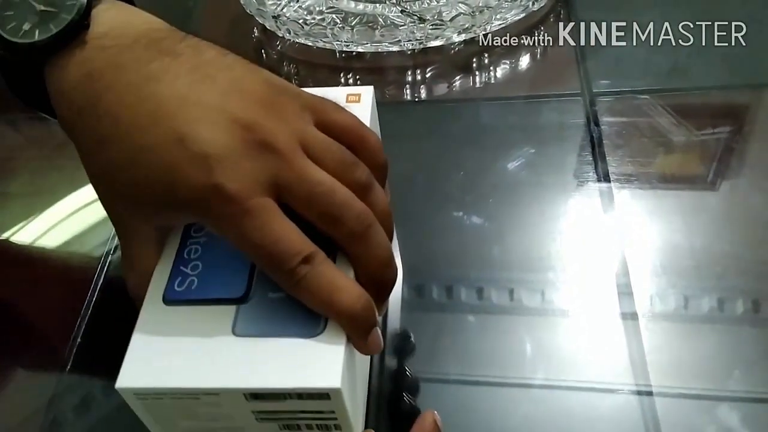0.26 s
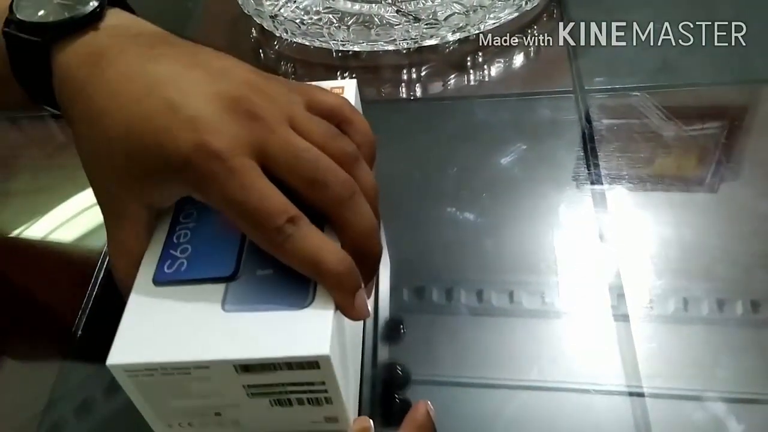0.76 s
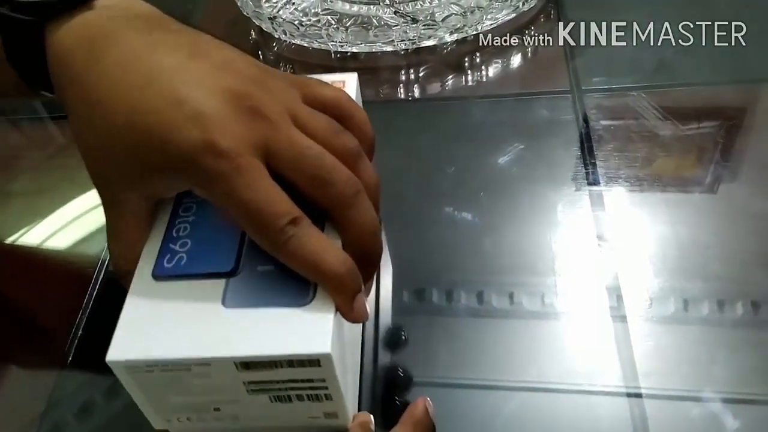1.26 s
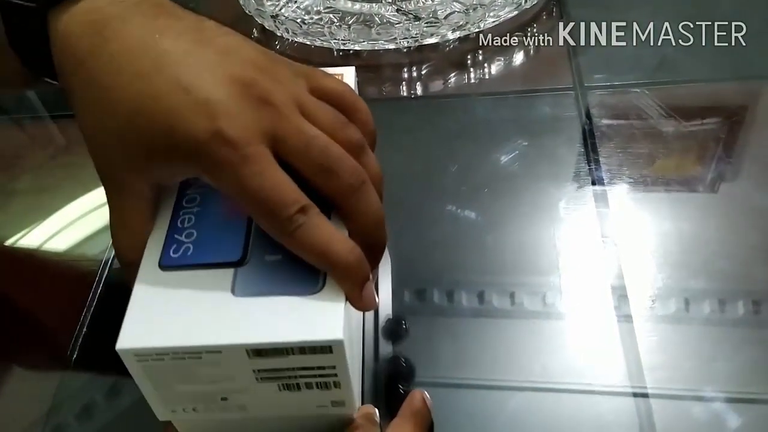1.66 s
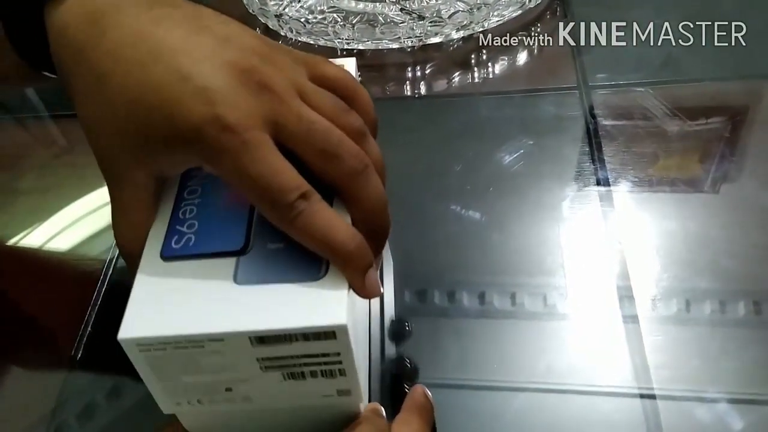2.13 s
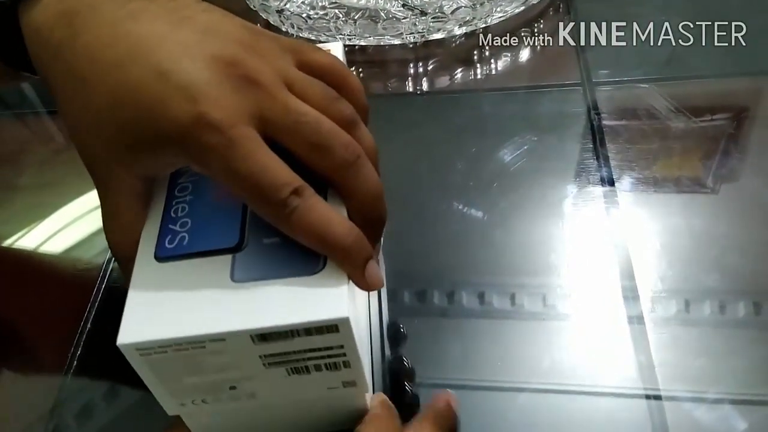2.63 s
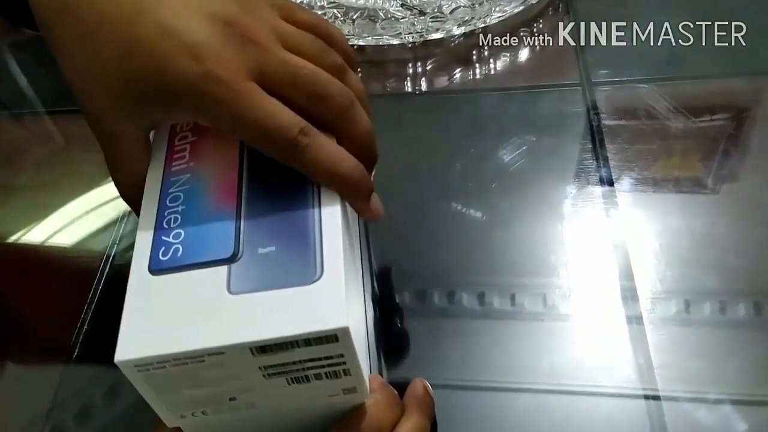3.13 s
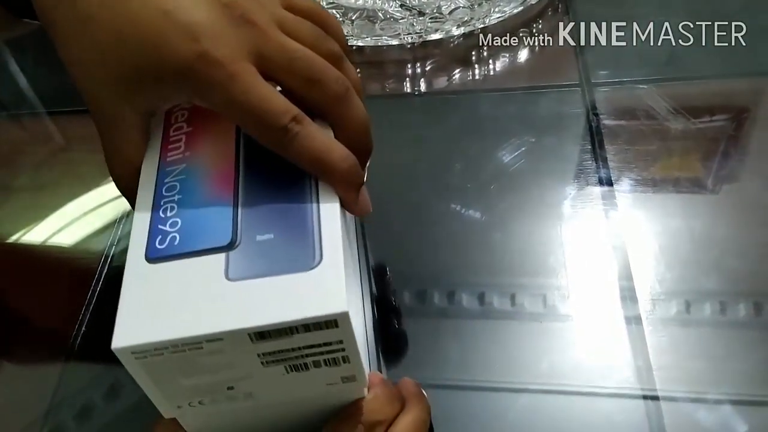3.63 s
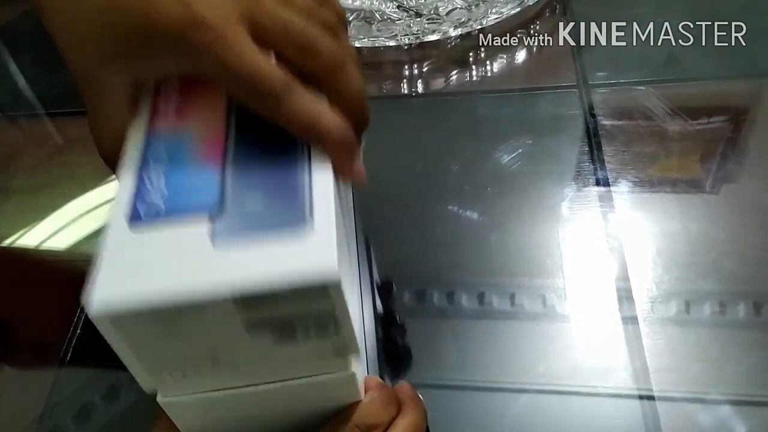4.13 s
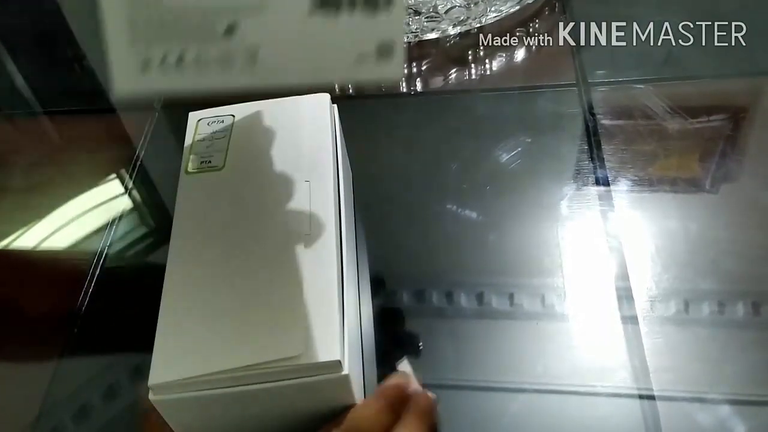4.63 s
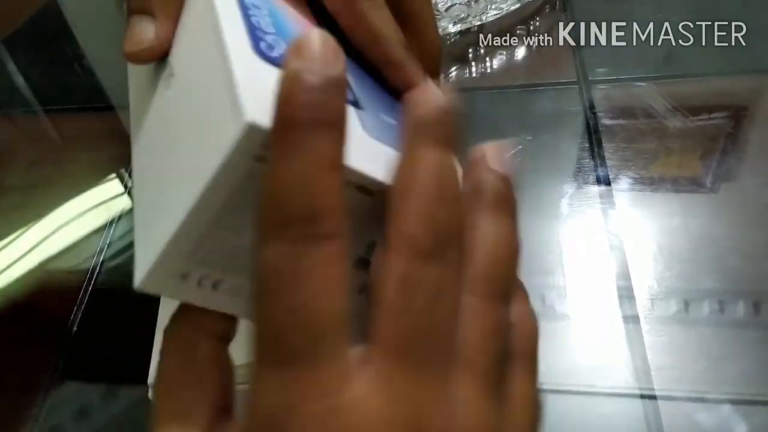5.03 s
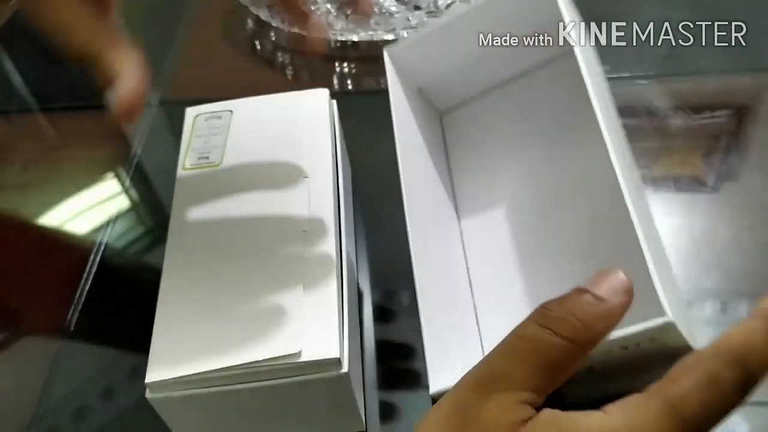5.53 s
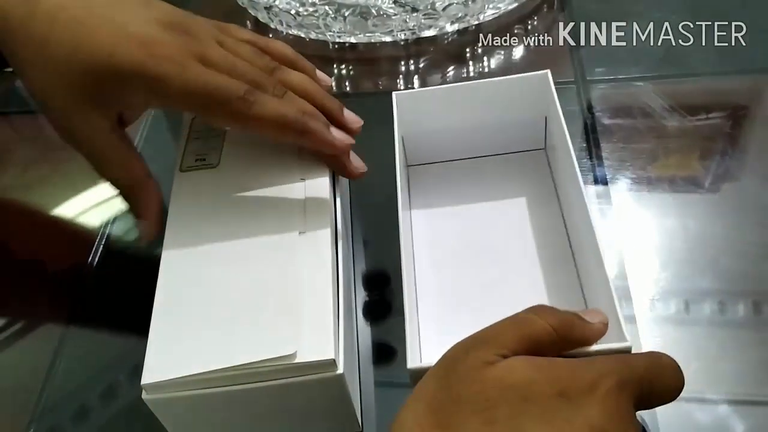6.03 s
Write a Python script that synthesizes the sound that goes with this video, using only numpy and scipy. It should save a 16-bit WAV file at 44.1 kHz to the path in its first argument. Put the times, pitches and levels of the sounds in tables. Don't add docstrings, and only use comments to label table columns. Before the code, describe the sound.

Close up in a small hard room, a stiff little cardboard box is knocked and shifted on a glass table, each landing a short boomy thud. Fingers rub and peel off the card with dry bright snaps. The lid pops free with a hollow clack and is soon set down. A low unsteady hum and soft hiss lie underneath, caught by a phone microphone.

```python
import sys
import numpy as np
from scipy import signal
from scipy.fft import rfft, irfft
from scipy.io import wavfile
from scipy.ndimage import uniform_filter1d, map_coordinates

SR = 44100
rng = np.random.default_rng(int(sys.argv[2]) if len(sys.argv) > 2 else 0)


def unload_wav(signal):
    wavfile.write(
        sys.argv[1],
        SR,
        np.round(np.clip(np.atleast_2d(signal).T, -1, 1) * 32767).astype(np.int16),
    )


def invert_db(level):
    return 10 ** (np.asarray(level, dtype=float) / 20)


N = 277521


def unit(x):
    return x / np.sqrt(np.mean(x ** 2) + 1e-20)


def along(points, hz):
    f, v = np.transpose(points)
    return np.interp(np.log(hz + 1), np.log(f + 1), v)


def wobble(rate):
    return map_coordinates(rng.standard_normal(int(N * rate / SR) + 4), [np.arange(N) * rate / SR])


def coloured(x, points):
    size = 32768
    gain = invert_db(along(points, np.fft.rfftfreq(size, 1 / SR)))
    cepstrum = irfft(np.log(gain + 1e-6), size)
    cepstrum[1:size // 2] *= 2
    cepstrum[size // 2 + 1:] = 0
    response = irfft(np.exp(rfft(cepstrum)), size)[:size // 2]
    return signal.fftconvolve(x, response)[:len(x)]


# f/Hz, t60/s
ROOM = [(60, 0.28), (300, 0.49), (1000, 0.44), (3000, 0.62), (8000, 0.51), (15000, 0.15)]


def tail(size):
    hz, t, z = signal.stft(rng.standard_normal(size), SR, nperseg=512)
    patches_db = 3 * unit(uniform_filter1d(rng.standard_normal(z.shape), size=4, axis=1))
    fade_db = -60 * t / along(ROOM, hz)[:, None]
    x = signal.istft(z * invert_db(patches_db + fade_db), SR, nperseg=512)[1][:size]
    x = x * (1 - np.exp(-np.arange(size) / SR / 0.0071))
    return x / np.linalg.norm(x)


# f/Hz, level/dB per Hz
HUM = [(13, -78), (22, -15), (45, -7.5), (86, 4.5), (106, 0.5), (125, -8.5), (203, -21), (231, -17.5),
       (267, -22.5), (347, -18.5), (500, -23.5), (650, -50.5), (1100, -120)]
# f/Hz, level/dB per Hz
HISS = [(88, -25.5), (150, -10), (244, -1), (475, -9), (589, -14), (774, -12.5), (1630, -19.5), (2270, -19),
        (6390, -25), (14200, -28), (16000, -30)]
# t/s, level/dB
RUMBLE = [(0, -52), (.28, -57), (.54, -51), (.78, -54), (.98, -44), (1.15, -50), (1.4, -53), (2.07, -52),
          (2.4, -48), (2.75, -55), (3.1, -52), (3.26, -46), (3.47, -51), (3.75, -50), (4.3, -53),
          (4.75, -56.5), (5.75, -54), (6.29, -55.5)]
HISS_DB = -56.5


def background():
    hum_db = np.interp(np.arange(N) / SR, *np.transpose(RUMBLE))
    hum = invert_db(hum_db + 3 + 2.15 * wobble(9)) * unit(coloured(rng.standard_normal(N), HUM))
    hiss = invert_db(HISS_DB) * unit(coloured(rng.standard_normal(N), HISS))
    return hum + hiss


# t/s, f/Hz, width/Hz, level/dB, hold/s
SQUEAKS = [(.133, 4600, 250, -67, .12), (.7, 1700, 120, -57, .1), (.797, 2050, 250, -59, .11),
           (1.12, 1090, 130, -65, .36), (1.4, 3900, 700, -55, .09), (1.45, 3700, 260, -63, .345),
           (1.44, 4550, 350, -63, .14), (1.406, 1640, 190, -58, .03), (1.867, 3050, 200, -62, .03),
           (1.72, 4300, 700, -63, .17), (2.22, 2900, 1500, -56, .1), (2.714, 4500, 1200, -55, .12),
           (3.62, 10000, 900, -69, .1), (4.728, 4040, 700, -55, .025), (5.19, 3900, 400, -62, .05),
           (5.897, 980, 300, -58, .14), (5.228, 280, 50, -41, .02), (5.28, 280, 50, -49, .015),
           (5.301, 3500, 900, -67, .11), (.72, 1150, 100, -60, .04), (.852, 2800, 350, -58, .05),
           (.695, 420, 60, -57, .04), (5.242, 1300, 400, -54, .05), (5.28, 4580, 300, -64, .12),
           (5.832, 2000, 200, -51, .02), (5.822, 2330, 200, -52, .025), (5.878, 2330, 200, -56, .01),
           (6.252, 1100, 150, -58.5, .05)]
# t/s, f/Hz, width/Hz, level/dB
TICKS = [(.528, 250, 110, -38), (.528, 800, 600, -48), (.778, 3380, 300, -44), (1.678, 5000, 300, -48),
         (1.678, 9600, 400, -50), (2.984, 5300, 400, -42), (2.982, 500, 500, -46), (4.201, 310, 460, -38),
         (5.154, 900, 900, -55), (5.154, 2200, 400, -54), (5.191, 807, 250, -50), (5.209, 760, 250, -43),
         (5.229, 5600, 500, -47), (5.229, 3900, 500, -51), (5.2405, 950, 900, -41), (5.82, 4000, 1800, -52)]
# t/s, level/dB, hold/s
FLICKS = [(.862, -55, .042), (1.868, -53.5, .022), (4.865, -52, .028), (5.858, -60, .04)]
# f/Hz, width/Hz, level/dB
GLOSS = [(7000, 780, 0), (9400, 450, -5), (4700, 500, -10)]
# t/s, level/dB, hold/s
SHAKES = [(2.215, -62, .19)]
# f/Hz, width/Hz, level/dB
DISH = [(3680, 130, 0), (3360, 160, -3), (6200, 110, -3.5), (9250, 130, -5)]
TICK_HOLD_S = .004
SQUEAK_T60_S, TICK_T60_S, FLICK_T60_S, DISH_T60_S = .36, .04, .45, .35


def singing():
    lines = [(*row, SQUEAK_T60_S) for row in SQUEAKS]
    lines += [(*row, TICK_HOLD_S, TICK_T60_S) for row in TICKS]
    for events, body, t60 in (FLICKS, GLOSS, FLICK_T60_S), (SHAKES, DISH, DISH_T60_S):
        for s, db, hold in events:
            lines += [(s, hz, width, db + rel_db, hold, t60) for hz, width, rel_db in body]
    out, t = np.zeros(N + SR), np.arange(SR * 3 // 4) / SR
    f = np.fft.rfftfreq(len(t), 1 / SR)
    for s, hz, width, db, hold, t60 in lines:
        resonance = 1 / (1 + (2 * (f - hz) / width) ** 2)
        line = unit(irfft(rfft(rng.standard_normal(len(t))) * resonance, len(t)))
        fade_db = -60 * np.maximum(t - hold, 0) / t60
        out[round(s * SR):][:len(t)] += line * invert_db(db + fade_db) * (1 - np.exp(-8 * t / hold))
    return out[:N] * invert_db(2.3 * wobble(30))


# t/s, boom level/dB, card body level/dB, edge level/dB, click level/dB
FLAT = [(1.679, -20, -29.5, -22, -36.5), (2.208, -16.5, -28, -18, -36.5), (2.659, -18, -27, -22, -42)]
SOFT = [(.3465, -18.5, -31, -41, -54), (.929, -28.5, -41, -41.5, -47), (1.0893, -24, -29.5, -36.5, -58),
        (2.827, -42, -46, -38, -43)]
CORNER = [(.778, -15, -20.5, -18, -41)]
SET_DOWN = [(5.8195, -32.5, -25, -17.5, -48)]
LID = [(4.205, -21.5, -20, -15, -26)]
TAPS = [(.527, -48, -44, -52, -55), (.691, -57, -43, -70, -60), (2.981, -59, -46, -41, -43),
        (4.239, -44, -30, -24.5, -38), (4.281, -50, -36, -32, -46), (4.306, -54, -40, -38, -50),
        (5.154, -66, -55, -50, -54), (5.224, -62, -48, -42, -54), (5.241, -66, -52, -45, -46)]
# knocks, thump under boom level/dB, hollow over body level/dB,
# rim over the mean of edge and click level/dB, first contact level/dB
LANDINGS = [
    (FLAT, -9, 6.5, -13, 19.5),
    (SOFT, -12, 4.5, -1, 13),
    (CORNER, -13.5, -3, .5, 20.5),
    (LID, -20, 4, -11.5, 22.5),
    (SET_DOWN, -25, -1, -1.5, 0),
    (TAPS, 0, 1, -2, 16),
]
# f/Hz, level/dB, t60/s
MODES = [(69.04, 11, 0.39), (91.3, -2, 0.59), (137.8, -12, 0.62), (175.1, -4, 0.32), (219.8, 1.5, 0.22),
         (275.3, -1.5, 0.34), (303.4, -2, 0.47), (352.4, -3.5, 0.43), (404, -0.5, 0.26), (462, -3, 0.18),
         (495.3, -2, 0.31), (551, -5, 0.17), (619, -22.5, 0.13), (716, -13, 0.28), (822, -7, 0.21),
         (822, -1, 0.2), (931, -14, 0.69), (997, -7.5, 0.34), (1067, -1.5, 0.29), (1167, -18.5, 0.63),
         (1353, -12, 0.66), (1456, 0, 0.3)]
BANDS_HZ = [70, 150, 260, 420, 800, 1170, 1370, 1750, 2150, 2600, 5000, 14000]


def knocks():
    out, t = np.zeros(N + SR), np.arange(SR * 3 // 4) / SR
    hz, mode_db, t60 = np.transpose(MODES)[:, :, None]
    modes = invert_db(-60 * t / t60) * np.exp(2j * np.pi * hz * t)
    settled = 1 + np.exp(np.minimum((t - .058) / 0.0026, 50))
    pane = np.sin(2 * np.pi * 136 * t) * invert_db(1.5 - 60 * t / 1.24) / settled
    hits = [(row, kind) for rows, *kind in LANDINGS for row in rows]
    for (s, boom, body, edge, click), kind in hits:
        thump, hollow, rim, contact_db = np.add(kind, [boom, body, (edge + click) / 2, 0])
        strength = invert_db(mode_db + 0.91 * rng.standard_normal(hz.shape))
        strength = strength * np.exp(0.44j * rng.standard_normal(hz.shape))
        ring = pane + np.imag(strength[:, 0] @ modes)
        rattle = rng.standard_normal(len(t)) * invert_db(-60 * t / 0.036) * (1 - np.exp(-t / 0.00093))
        answer = invert_db(-3) * rattle + invert_db(-31) * ring * (1 - np.exp(-t / 0.0034))
        answer += invert_db(16) * tail(len(t))
        answer[SR // 1000] -= invert_db(contact_db)
        # a steep fall above about 1.2 kHz, then the weaker rim modes
        levels = [thump + 30, boom + 30, body + 24, hollow + 22, edge + 14, edge + 12,
                  (edge + rim) / 2 + 3, rim + 9, rim + 6, (rim + click) / 2 - 6, click - 4, click - 10]
        points = [(25, thump + 7), *zip(BANDS_HZ, levels), (16000, click - 18)]
        out[round(s * SR):][:len(t)] += coloured(answer, points)
    return out[:N]


# t/s, f/Hz, level/dB, t60/s
PANELS = [(.3475, 105, -25, .09), (.7798, 105, -19, .09), (1.0905, 105, -26, .09), (1.6808, 105, -24, .09),
          (2.2098, 105, -20, .09), (2.6603, 105, -21, .09), (.3483, 380, -20, .03), (.527, 900, -38, .015),
          (.526, 240, -34, .06), (.7803, 1050, -20, .04), (.7806, 400, -18, .04), (1.0913, 450, -21, .04),
          (1.681, 480, -25, .025), (1.68, 1720, -38, .03), (2.2098, 510, -20, .03),
          (2.6603, 388, -12.5, .05), (2.826, 380, -36, .04), (2.981, 400, -37, .04), (4.2038, 250, -6, .03),
          (4.2077, 400, -13, .05), (4.206, 800, -19, .04), (4.2065, 2400, -28, .02),
          (4.2395, 1000, -22, .02), (4.281, 700, -25, .03), (5.2305, 600, -33, .02),
          (5.2385, 900, -34, .015), (5.242, 950, -30, .02), (5.242, 1550, -34, .015),
          (5.8195, 800, -23, .06), (5.8215, 430, -22, .05), (5.8225, 240, -25, .06),
          (5.821, 1150, -28, .04), (5.821, 1500, -33, .03), (5.827, 800, -21, .04), (5.8262, 430, -23, .04)]
PANEL_ATTACK_S = .0006


def panels():
    out, t = np.zeros(N + SR), np.arange(SR // 5) / SR
    attack = 1 - np.exp(-t / PANEL_ATTACK_S)
    for s, hz, db, t60 in PANELS:
        out[round(s * SR):][:len(t)] += invert_db(db - 60 * t / t60) * np.sin(2 * np.pi * hz * t) * attack
    return coloured(out[:N], [(20, -30), (70, 0), (16000, 0)])


def band(lo_hz, hi_hz, skirt_db):
    return [(lo_hz / 2, skirt_db), (lo_hz, 0), (hi_hz, 0), (hi_hz * 2, skirt_db)]


def grainy(points, rough_db, rate):
    z = signal.stft(rng.standard_normal(N) * invert_db(rough_db * wobble(rate)), nperseg=512)[2]
    field = uniform_filter1d(rng.standard_normal(z.shape), size=4, axis=0)
    field = uniform_filter1d(field, size=10, axis=1)
    patchy = signal.istft(z * invert_db(2 * unit(field)), nperseg=512)[1][:N]
    return unit(coloured(patchy, points))


STROKE_DB = 25


def strokes(rows, level_db):
    s, rise, fall = np.transpose(rows)[:3, :, None]
    t = np.arange(0, N + 32, 32) / SR
    away = np.where(t < s, (s - t) / rise, (t - s) / fall)
    return np.interp(np.arange(N) / SR, t, invert_db(level_db[:, None] - STROKE_DB * away).sum(0))


# peak t/s, rise t/s, fall t/s, level/dB, brightness level/dB
RUBS = [(.78, .02, .03, -48, -15), (.88, .12, .17, -46, -4), (1.878, .08, .12, -53, -4),
        (2.8, .25, .1, -50, -6), (2.875, .09, .18, -45, 2), (3.878, .2, .15, -60, -9),
        (4.888, .08, .15, -54, 4), (5.82, .01, .05, -44.5, -18), (5.888, .08, .2, -54, -4)]
# peak t/s, rise t/s, fall t/s, level/dB, brightness level/dB
PEELS = [(.932, .08, .25, -63, 4), (1.424, .05, .06, -50, -7), (2.685, .02, .08, -57, -5),
         (2.83, .03, .06, -46, 9), (2.98, .03, .2, -55, 6), (3.21, .15, .2, -68, 8), (3.58, .1, .5, -66, 5),
         (4.197, .004, .04, -43, 2), (4.222, .008, .03, -43, 0), (4.24, .006, .03, -40, -2),
         (4.208, .008, .02, -33, 2), (4.216, .015, .13, -40, -1), (4.735, .015, .06, -55, 12),
         (4.77, .3, .2, -60, 9), (4.9, .08, .12, -60, 4), (5.156, .006, .02, -52, -14),
         (5.24, .07, .15, -44, 1)]
# peak t/s, rise t/s, fall t/s, level/dB
DRAG = [(.768, .3, .02, -54), (1.22, .05, .15, -56), (1.432, .25, .3, -57), (3.896, .9, .3, -57),
        (4.18, .5, .04, -53), (6.27, .03, .3, -63)]
PAD_HISS_DB, PEEL_HISS_DB = -17, 1
HISS_FOLLOWS = .6


def rubbing():
    rows = RUBS + PEELS
    db, bright_db = np.transpose(rows)[3:]
    kind_db = np.repeat([PAD_HISS_DB, PEEL_HISS_DB], [len(RUBS), len(PEELS)])
    hiss_db = db + HISS_FOLLOWS * bright_db + kind_db
    drag_db = np.transpose(DRAG)[3]
    scuff = strokes(rows, db - 3) * grainy(band(1930, 4240, -24.5), rough_db=2, rate=170)
    bright = strokes(rows, db + bright_db - 4) * grainy(band(5400, 10240, -35), rough_db=3, rate=260)
    hiss = strokes(rows, hiss_db - 6) * grainy(band(10500, 14300, -46), rough_db=2, rate=170)
    drag = strokes(DRAG, drag_db - 2) * grainy(band(354, 1244, -25), rough_db=4.5, rate=60)
    return scuff + bright + hiss + drag


# t/s, peak level/dB, centre f/Hz
SNAPS = [(.9296, -32, 3300), (1.4092, -36, 3750), (2.6625, -30, 13000), (2.731, -42, 4150),
         (2.832, -12, 10000), (2.9833, -19, 8750), (3.007, -32, 11000), (3.025, -29, 10800),
         (3.0899, -36, 8000), (3.204, -39, 9600), (4.7022, -37, 4230), (4.239, -30, 4000),
         (4.7365, -22, 10500), (5.229, -32, 8940), (5.2415, -29, 3130)]


def snaps():
    out, t = np.zeros(N + SR), np.arange(SR // 10) / SR
    for s, db, hz in SNAPS:
        burst = rng.standard_normal(len(t)) * invert_db(-60 * t / 0.015) * (1 - np.exp(-t / 0.003)) ** 2
        burst[SR // 250] += 1.5
        burst = coloured(burst, [(300, -30), (hz / 2, -12), (hz, 0), (hz * 1.6, -11)])
        out[round((s - .003) * SR):][:len(t)] += invert_db(db + 6) * burst
    return out[:N]


def scene():
    hands = rubbing() + snaps()
    hands += invert_db(-8) * signal.fftconvolve(hands, tail(SR // 2))[:N]
    return (background() + singing() + knocks() + panels() + hands)[None]


def low_pass(x):
    return signal.sosfilt(signal.butter(12, 16290, fs=SR, output="sos"), x)


def record(dry):
    hz, _, z = signal.stft(dry, SR, nperseg=2048, noverlap=1536)
    power = uniform_filter1d(np.abs(z) ** 2, size=6, axis=1) + 1e-20
    floor = np.exp(uniform_filter1d(np.log(power), size=60, axis=1))
    share = along([(1200, .02), (4000, .5), (11000, .88), (15000, 1.05)], hz)[:, None]
    kept = 1 / (1 + (share * floor / power) ** 5)
    below_top = hz[:, None] < 15650
    mix = signal.istft(z * kept * below_top, SR, nperseg=2048, noverlap=1536)[1][:, :N]
    return low_pass(mix)


dry = scene()
out = record(dry)
unload_wav(out)
```